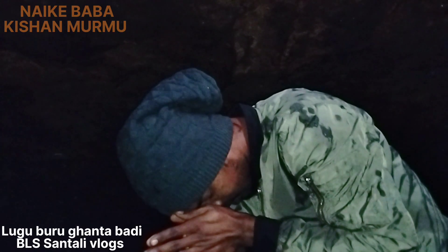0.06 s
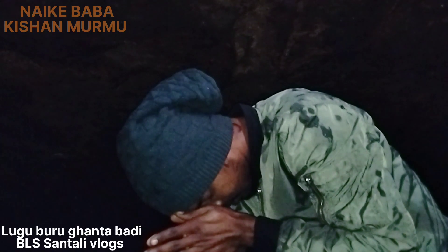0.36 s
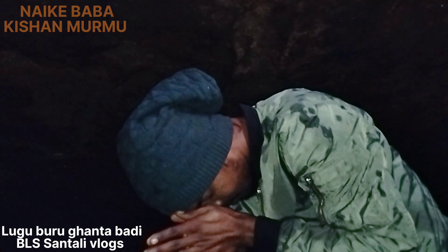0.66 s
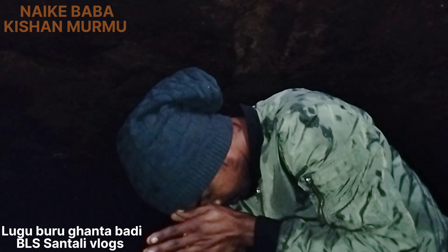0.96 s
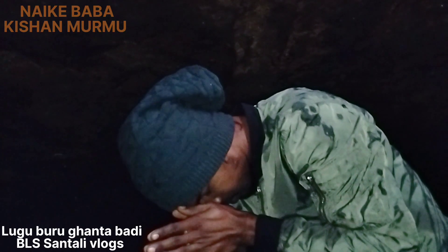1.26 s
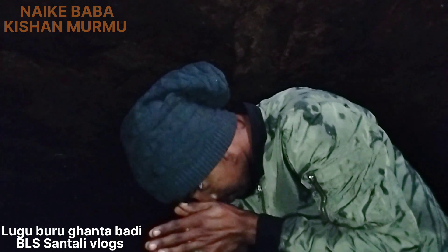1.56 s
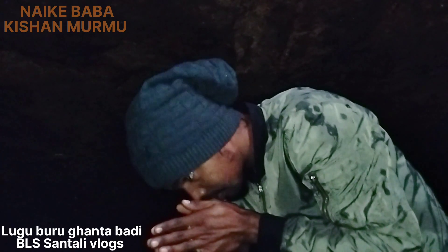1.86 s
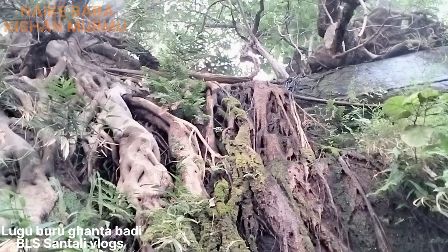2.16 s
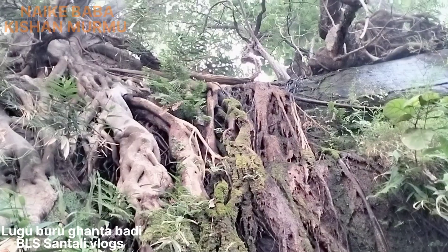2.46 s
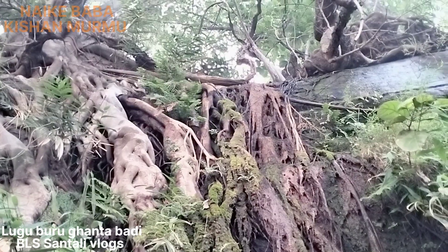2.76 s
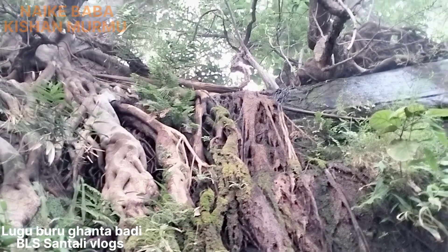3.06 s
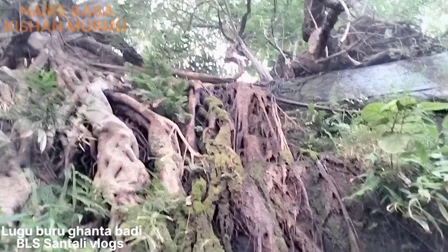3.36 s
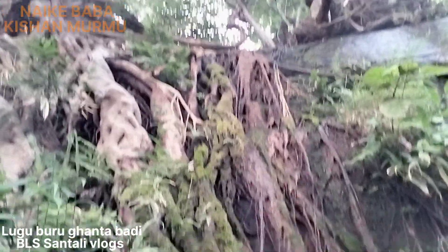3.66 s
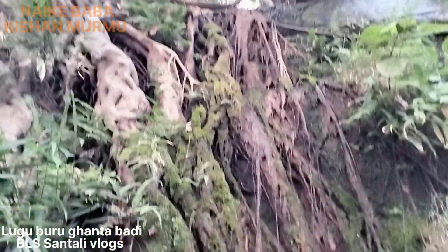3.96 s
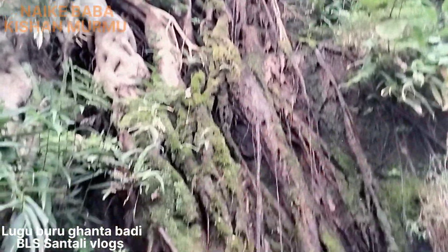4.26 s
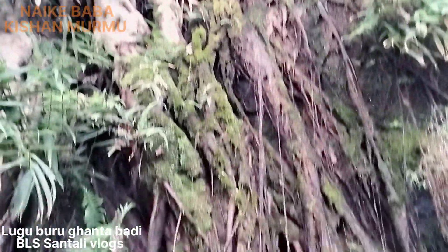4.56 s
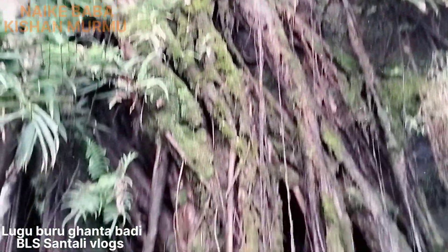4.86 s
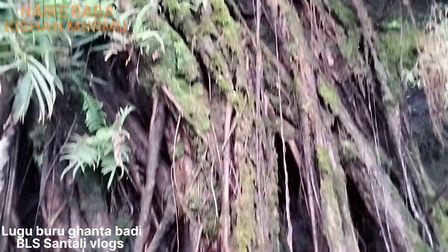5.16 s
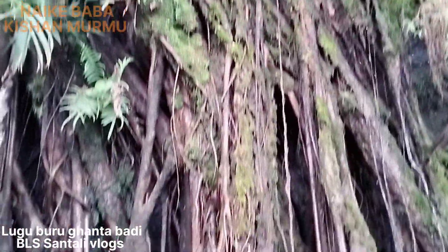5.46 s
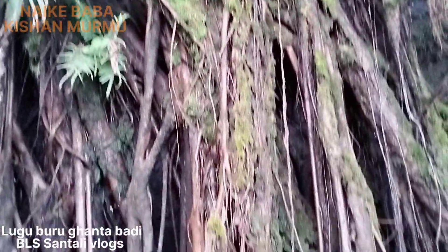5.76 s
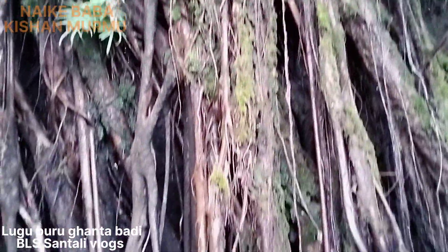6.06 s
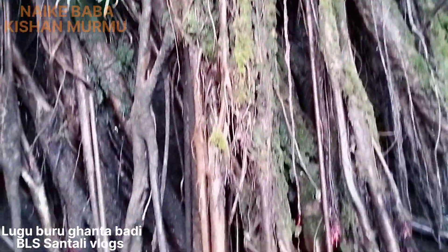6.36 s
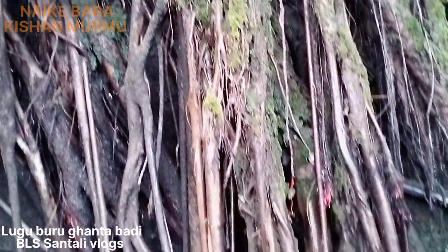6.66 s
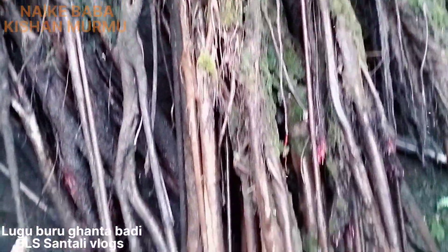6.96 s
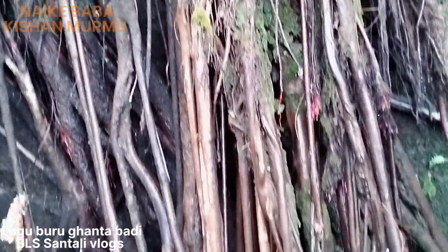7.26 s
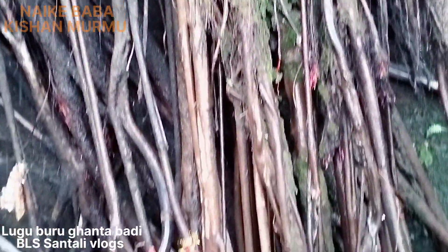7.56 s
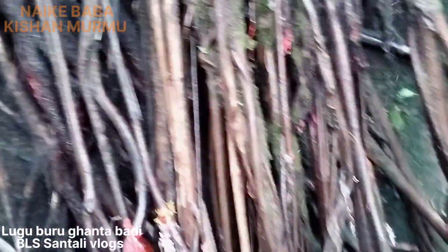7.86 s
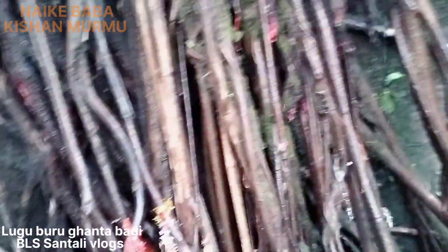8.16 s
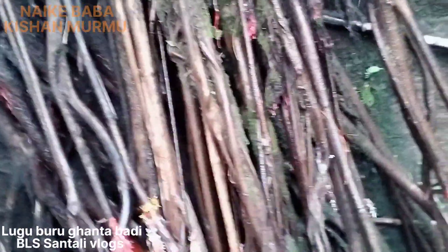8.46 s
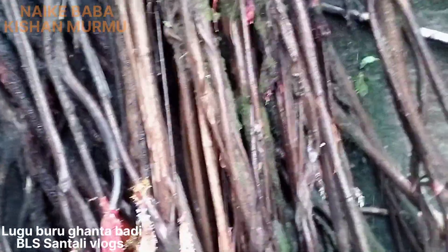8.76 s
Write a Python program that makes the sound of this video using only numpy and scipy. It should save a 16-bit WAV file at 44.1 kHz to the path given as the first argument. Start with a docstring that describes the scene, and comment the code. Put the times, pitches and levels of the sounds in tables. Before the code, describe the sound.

For the first 2.3 seconds, falling water is heard from inside a small cave: a faint hiss, leaning right, over a low wash that booms softly in the hollow. About seven small, irregular slops of water slap the rock during this stretch. At 2.3 seconds everything cuts to dead silence for about half a second.

At 2.9 seconds the water returns, much louder, close and in the open air, swelling quickly to a steady level. It pours down a rock face as an even rush of splashing and fine hissing spray, with a softer gurgling plunge underneath. Two brief slops barely stand out, at about 4.6 and 7.4 seconds. From 6 seconds the sound gradually turns slightly brighter, and from about 7.3 seconds it drifts a little left as the hand-held microphone turns. The rush continues unbroken until the end, at around 9 seconds.

```python
"""Water falls down a rock face, heard through the two microphone ports of a hand-held camera.
First, inside a small cave, it is a faint hiss over a low wash that booms in the modes of the hollow,
with slops of water slapping the rock. At 2.3 s comes half a second of dead silence. Then the water
swells up close and in the open: a plunge, a splash and a spray, each turbulent noise with ringing bubbles.
From 6 s the camera tilts down and the sound brightens; near the end it turns and the water drifts left."""
import sys
import numpy as np
from scipy import signal
from scipy.fft import rfft, irfft, next_fast_len
from scipy.io import wavfile
from scipy.ndimage import uniform_filter1d, map_coordinates

SR = 44100
rng = np.random.default_rng(int(sys.argv[2]) if len(sys.argv) > 2 else 0)


def digitize_waveform(pressure):
    """Quantize a signal to 16-bit integers and store it at the path in sys.argv[1].

    Rows of a 2-D input are taken as channels; values are limited to [-1, 1].
    """
    field = np.atleast_2d(pressure).T
    bounded = np.clip(field, -1, 1)
    quanta = np.round(bounded * 32767).astype(np.int16)
    wavfile.write(sys.argv[1], SR, quanta)


N = 393813
TIME = np.arange(N) / SR
CAVE_END_S, OPEN_START_S = 2.3146, 2.8815
BAND_LIMIT_HZ = 15760


def amp(db):
    """Amplitude ratio of a level in decibels."""
    return 10 ** (np.asarray(db) / 20)


def unit(x):
    """Normalisation to rms 1."""
    return x / np.sqrt(np.mean(x ** 2) + 1e-20)


def along(points, hz):
    """Interpolation of (frequency, value) points on a logarithmic frequency axis."""
    freqs, values = np.transpose(points)
    return np.interp(np.log(hz + 1), np.log(freqs + 1), values)


def wobble(rate_hz):
    """Slow random modulation: a spline through Gaussian knots."""
    knots = rng.standard_normal(int(N * rate_hz / SR) + 4)
    return map_coordinates(knots, [TIME * rate_hz])


def filtered(x, response):
    """Linear filtering: the spectrum is multiplied by a frequency response."""
    size = next_fast_len(N + SR // 2)
    return irfft(rfft(x, size) * response(np.fft.rfftfreq(size, 1 / SR)), size)[..., :N]


def at_ports(pair, direct, lag_ms=0.36, spacing_ms=0.65):
    """Spatial coherence: direct sound reaches the right port late; diffuse sound agrees only in the bass."""
    def coherence(hz):
        share = along(direct, hz)
        khz = hz / 1000
        return share * np.exp(-2j * np.pi * khz * lag_ms) + (1 - share) * np.sinc(2 * khz * spacing_ms)
    incoherent = filtered(pair[1], lambda hz: np.sqrt(np.abs(1 - np.abs(coherence(hz)) ** 2)))
    return np.array([pair[0], filtered(pair[0], coherence) + incoherent])


def rush(spectrum, direct, patchy_db):
    """Turbulence: coloured noise whose level varies in small patches of time and frequency; rms 1."""
    cells = signal.stft(rng.standard_normal((2, N)), nperseg=512)[2]
    patches = uniform_filter1d(rng.standard_normal(cells.shape[1:]), size=7, axis=0)
    patches = unit(uniform_filter1d(patches, size=6, axis=1))
    churn = signal.istft(cells * amp(patchy_db * patches), nperseg=512)[1][:, :N]
    return unit(filtered(at_ports(churn, direct), lambda hz: amp(along(spectrum, hz))))


def resonate(x, modes):
    """Resonance: each mode lifts a narrow band about its frequency; rms 1."""
    def response(hz):
        return 1 + sum((amp(db) - 1) / (1 + (2 * (hz - centre) / width) ** 2)
                       for centre, width, db in modes)
    return unit(filtered(x, response))


def bubbles(count, pitch_hz, spread, cycles, size_db, samples):
    """Damped oscillation: each bubble loses 30 dB over `cycles` and glides up as it rises; rms 1."""
    onset, size, pan = rng.random((count, 3)).T
    hz = np.minimum(pitch_hz * np.exp(spread * rng.standard_normal(count)), BAND_LIMIT_HZ)
    age = np.arange(samples)
    turns = hz[:, None] * age / SR
    life = np.minimum(turns / cycles, 2)
    envelope = amp(-30 * life) * (1 - np.exp(-2 * turns)) * (life < 2)
    strength = amp(-size_db * np.log(np.maximum(size, .005)))  # many faint, a few loud
    rings = strength[:, None] * envelope * np.sin(2 * np.pi * turns * (1 + 0.061 * life))
    place = ((onset * N).astype(int)[:, None] + age).ravel()
    sides = [rings * np.sqrt(share)[:, None] for share in (pan, 1 - pan)]
    return unit(np.array([np.bincount(place, side.ravel(), N)[:N] for side in sides]))


def panned(pair, balance_db):
    """Level difference: left exceeds right by balance_db."""
    return np.array([pair[0] * amp(balance_db / 2), pair[1] * amp(-balance_db / 2)])


# Spectrum of the low wash (frequency [Hz], relative level [dB])
WASH_SPECTRUM = [(20, -15), (40, -6.5), (60, -4), (110, -1.5), (170, -2), (330, -4.5), (600, -2.5),
                 (900, -2), (1300, -4.5), (1800, -14.5), (3500, -38)]
# Modes of the hollow (frequency [Hz], bandwidth [Hz], gain [dB])
CAVE_MODES = [(58.6, 5.2, 14.5), (86, 5, 9), (287, 25, 4), (386, 19, 6.5), (572, 44, 7.5), (868, 22, 5.5)]
# Direct sound in the cave (frequency [Hz], share [0-1])
CAVE_DIRECT_SHARE = [(100, .02), (1400, 0.14), (3000, 0.034)]


def cave_wash(level_db=-49.4):
    """Cavity resonance: a steady wash of water excites the modes of the hollow."""
    wash = rush(WASH_SPECTRUM, CAVE_DIRECT_SHARE, patchy_db=1.9)
    return amp(level_db + .25 * wobble(10)) * resonate(wash, CAVE_MODES)


# Spectrum of the hiss in the cave (frequency [Hz], relative level [dB])
HISS_SPECTRUM = [(500, -38.5), (1300, -15), (2200, -0.5), (3500, -1), (4500, 0), (7000, -2.5), (10000, -4),
                 (13000, -10.5), (15600, -19.5)]


def cave_hiss(level_db=-46, spatter_db=0.9, spatter_s=0.035):
    """Superposition: fine drops merge into a hiss on the right, lifted by the spray of each slop."""
    spatter = sum(np.exp(-.5 * ((TIME - start - spatter_s / 2) / spatter_s) ** 2)
                  for start, _, _ in SLOP_IMPACTS)
    drops = bubbles(count=9000, pitch_hz=5040, spread=.45, cycles=4, size_db=4.5, samples=160)
    hiss = rush(HISS_SPECTRUM, CAVE_DIRECT_SHARE, patchy_db=1.0) + amp(-18.5) * drops
    gain = amp(level_db + spatter_db * spatter + 0.31 * wobble(14))
    return panned(gain * hiss, balance_db=-5.5)


def draught(level_db=-77.0, corner_hz=70):
    """Flow noise: moving air rumbles faintly and independently at each port."""
    noise = rng.standard_normal((2, N))
    return amp(level_db) * unit(filtered(noise, lambda hz: hz / (1 + (hz / corner_hz) ** 3)))


# Single slops of water (time [s], level [dB], centre frequency [Hz])
SLOP_IMPACTS = [(0.052, -45.5, 930), (.465, -47.5, 1100), (.772, -44.5, 597), (.915, -48, 848),
                (1.455, -45.5, 800), (1.72, -44, 950), (1.94, -47.5, 613), (4.64, -34, 1900),
                (7.408, -33, 1300)]


def slops(width_octaves=0.42, rise_s=0.002, cave_decay_s=0.023, open_decay_s=0.016):
    """Impact noise: a thicker gush slaps the rock, and its band of noise lingers longer in the cave."""
    noise = at_ports(rng.standard_normal((2, N)), CAVE_DIRECT_SHARE)
    out = np.zeros((2, N))
    for start, db, centre_hz in SLOP_IMPACTS:
        band = filtered(noise, lambda hz: np.exp(-.5 * (np.log2((hz + 1) / centre_hz) / width_octaves) ** 2))
        age = np.maximum(TIME - start, 0)
        decay_s = cave_decay_s if start < CAVE_END_S else open_decay_s
        envelope = (1 - np.exp(-age / rise_s)) * np.exp(-age / decay_s)
        out += amp(db) * envelope / envelope.max() * unit(band)
    return out


# Spectrum of the plunge (frequency [Hz], relative level [dB])
PLUNGE_SPECTRUM = [(20, -34), (60, -17.5), (105, -17), (160, -11), (220, -13), (270, -8.5), (400, -6),
                   (550, 0), (750, 0.5), (1050, 0), (1500, -1), (2600, -37)]
# Weak modes of clefts in the rock face (frequency [Hz], bandwidth [Hz], gain [dB])
CLEFT_MODES = [(189, 40, 2.5), (272, 30, 5), (359, 23, 3.5), (436.6, 14, 6), (555, 44, 3.5), (830, 52, 1.5),
               (930, 36, 2)]
# Direct sound in the open (frequency [Hz], share [0-1])
OPEN_DIRECT_SHARE = [(100, 0.1), (500, 0.76), (800, 0.1), (1400, 0.69), (2300, 0.07), (5000, 0.1),
                     (10000, 0)]


def plunge():
    """Air entrainment: plunging water traps large bubbles, whose gurgle resonates in the clefts."""
    gurgle = bubbles(count=2000, pitch_hz=806, spread=0.403, cycles=11.5, size_db=2.5, samples=1024)
    gurgle = at_ports(gurgle, OPEN_DIRECT_SHARE)
    roar = rush(PLUNGE_SPECTRUM, OPEN_DIRECT_SHARE, patchy_db=1.85)
    return resonate(roar + amp(-13) * gurgle, CLEFT_MODES)


# Spectrum of the splash (frequency [Hz], relative level [dB])
SPLASH_SPECTRUM = [(600, -42), (1200, -4.5), (1700, -3.5), (2300, 0), (3500, -2.5), (4800, -1.5),
                   (7000, -10), (10000, -46)]


def splash():
    """Bubble resonance: water breaking on rock makes noise and smaller, lightly damped bubbles."""
    beads = bubbles(count=5000, pitch_hz=2501, spread=0.305, cycles=35, size_db=1.0, samples=640)
    return rush(SPLASH_SPECTRUM, OPEN_DIRECT_SHARE, patchy_db=0.97) + amp(-12) * beads


# Spectrum of the spray (frequency [Hz], relative level [dB])
SPRAY_SPECTRUM = [(2500, -32), (4300, -5), (5500, -1), (7000, -0.5), (10000, -1.5), (13000, -7.5),
                  (15600, -15)]


def spray():
    """Pitch varies inversely with bubble radius: the tiniest fizz in the hiss of the spray."""
    fizz = bubbles(count=9000, pitch_hz=7170, spread=0.27, cycles=3.5, size_db=3.0, samples=96)
    return rush(SPRAY_SPECTRUM, OPEN_DIRECT_SHARE, patchy_db=0.8) + amp(-13.5) * fizz


def open_water(swell_db=3.5, swell_s=0.35, tilt_start_s=6, turn_start_s=7.3):
    """Common modulation: plunge, splash and spray swell in together and share the surges of the flow."""
    swell = amp(-swell_db * np.exp(-np.maximum(TIME - OPEN_START_S, 0) / swell_s))
    tilting_s = np.maximum(TIME - tilt_start_s, 0)  # tilting down trades splash for spray
    turning_s = np.maximum(TIME - turn_start_s, 0)  # turning moves the water to the left
    surge = wobble(11) + .7 * wobble(2.98)
    water = (amp(-41 + 0.16 * surge) * plunge()
             + amp(-32.5 - 0.38 * tilting_s + 0.31 * surge) * splash()
             + amp(-32.5 + 0.11 * tilting_s + 0.19 * surge) * spray())
    return panned(swell * water, balance_db=-1 + 0.4 * turning_s)


def scene():
    """Sound pressures add: first in the cave, then, after a dead silence, in the open."""
    inside, outside = TIME < CAVE_END_S, TIME > OPEN_START_S
    water = inside * (cave_wash() + cave_hiss()) + outside * open_water()
    return water + (inside | outside) * (slops() + draught())


# Resonances and notches of each port's duct (frequency [Hz], gain [dB])
LEFT_DUCT = [(1500, 2.5), (2300, 2.5), (3000, 1), (3900, 1), (5000, -7.5), (6400, -7.5), (7100, -10),
             (7700, -6), (8500, 4.5), (8900, 7), (10000, 4), (12000, 2), (14000, 0.5), (15500, 0.5)]
RIGHT_DUCT = [(1600, 2), (2500, -1.5), (3500, 1.4), (4300, -1.5), (5800, -0.5), (6900, 4.5), (7700, -5),
              (8300, -12), (8800, -28.5), (9300, -16), (11000, -8), (13000, -3), (15000, 1), (15600, 2)]


def record(dry):
    """Duct resonance: each port colours its channel, and a steep low-pass limits the band."""
    coloured = filtered(dry, lambda hz: amp([along(LEFT_DUCT, hz), along(RIGHT_DUCT, hz)]))
    return filtered(coloured, lambda hz: 1 / (1 + (hz / BAND_LIMIT_HZ) ** 600))


dry = scene()
out = record(dry)
digitize_waveform(out)
```